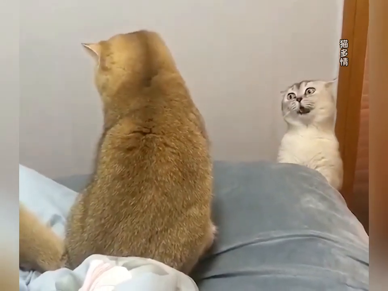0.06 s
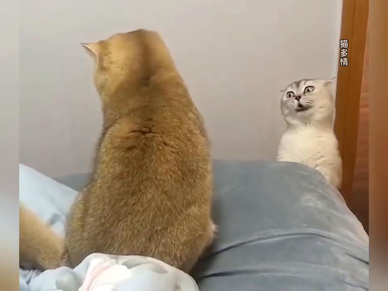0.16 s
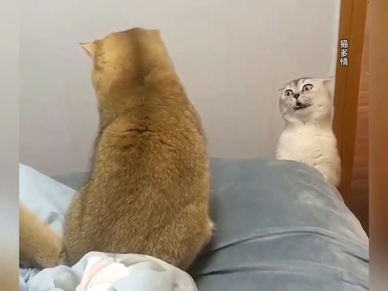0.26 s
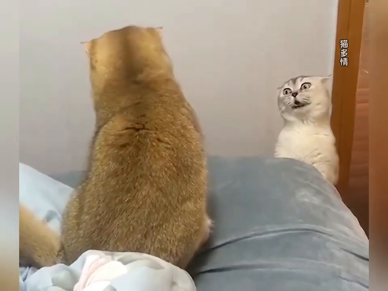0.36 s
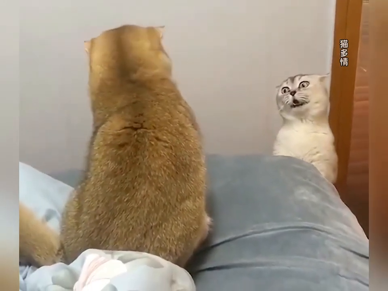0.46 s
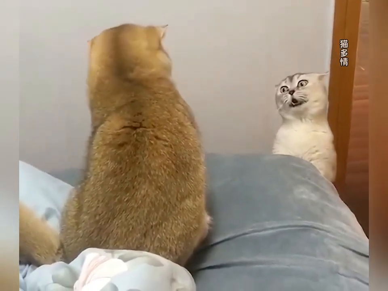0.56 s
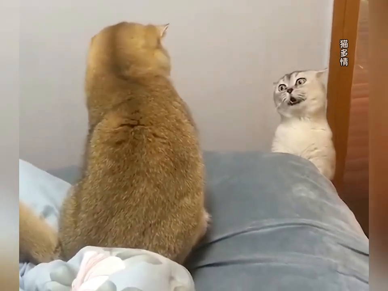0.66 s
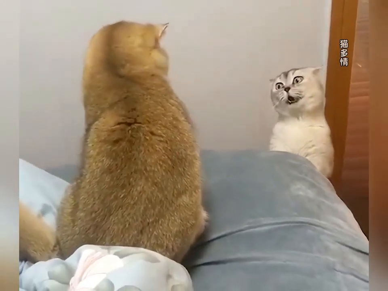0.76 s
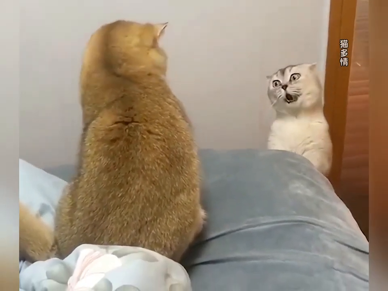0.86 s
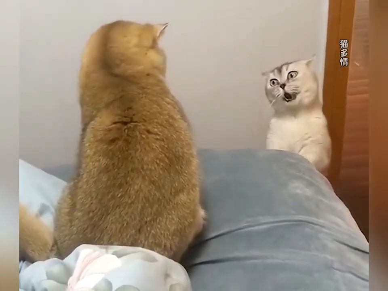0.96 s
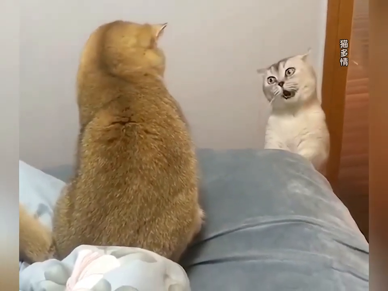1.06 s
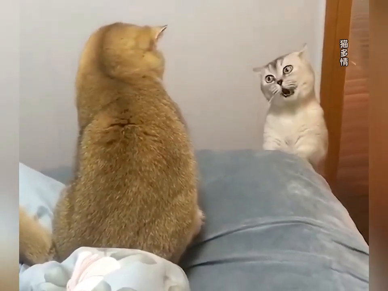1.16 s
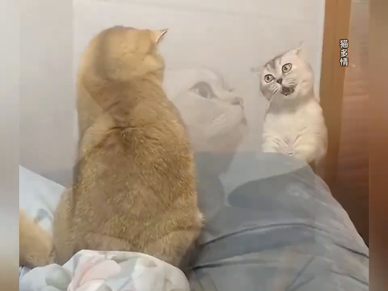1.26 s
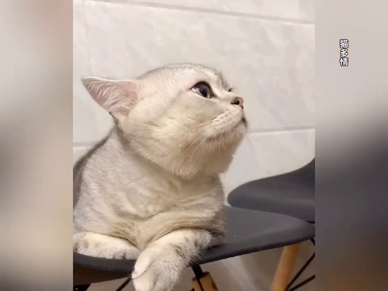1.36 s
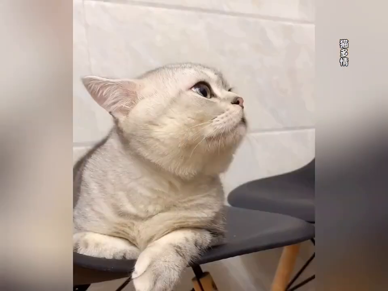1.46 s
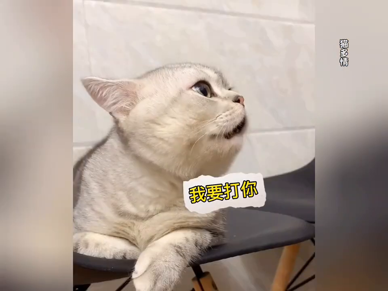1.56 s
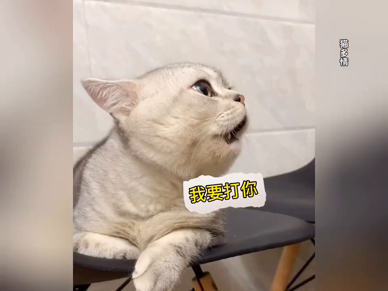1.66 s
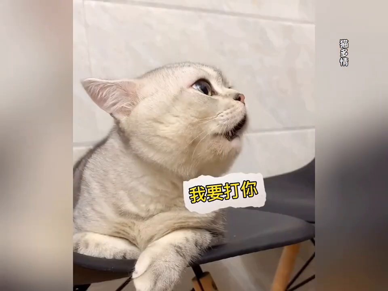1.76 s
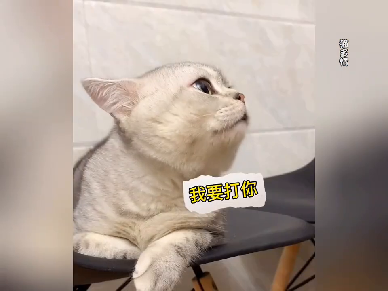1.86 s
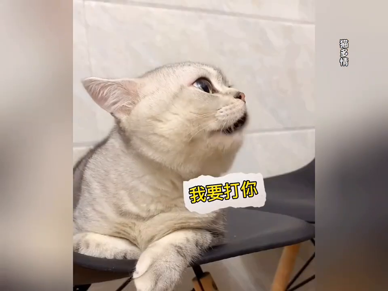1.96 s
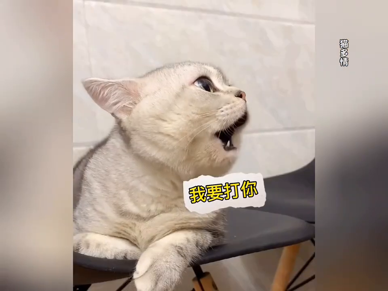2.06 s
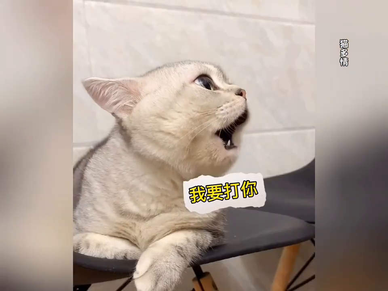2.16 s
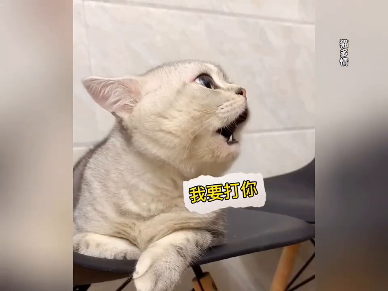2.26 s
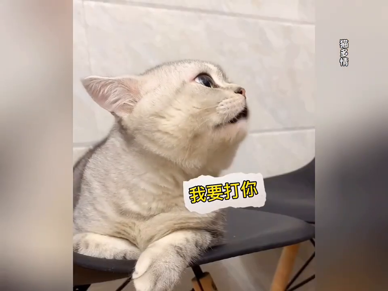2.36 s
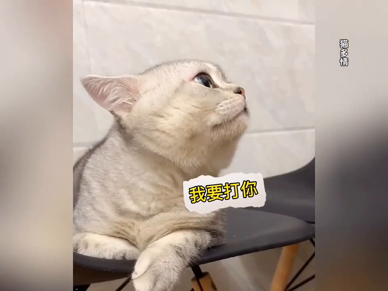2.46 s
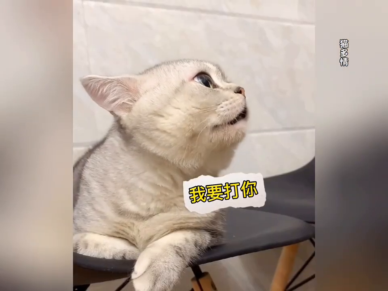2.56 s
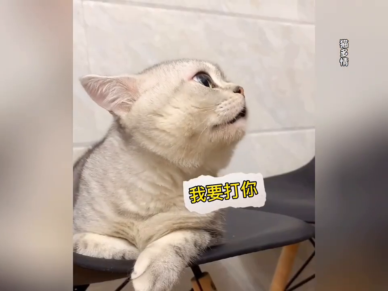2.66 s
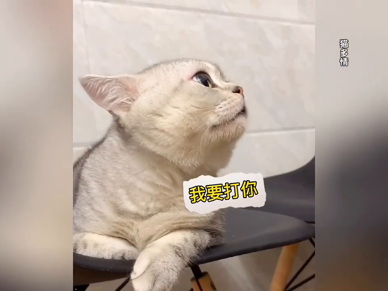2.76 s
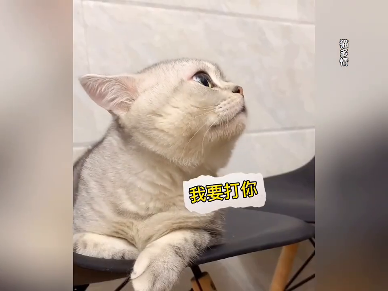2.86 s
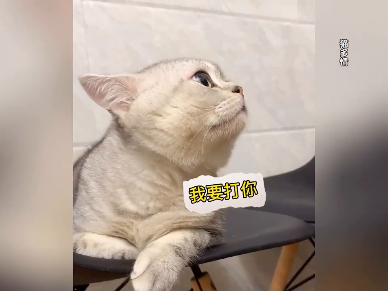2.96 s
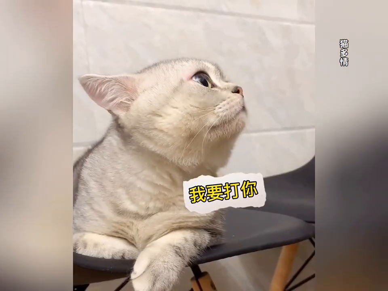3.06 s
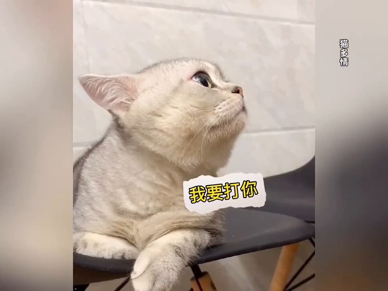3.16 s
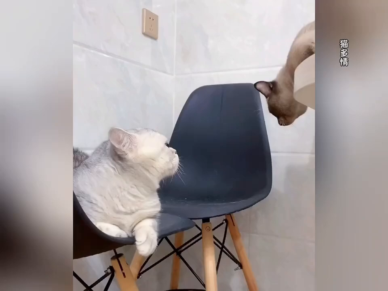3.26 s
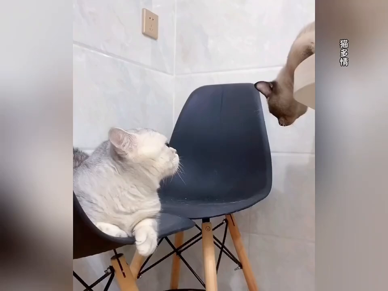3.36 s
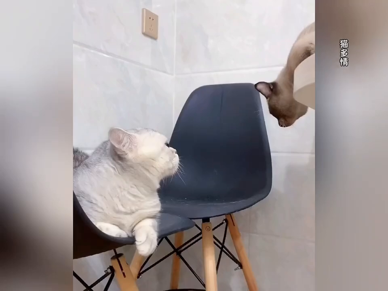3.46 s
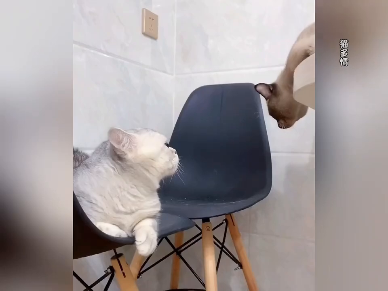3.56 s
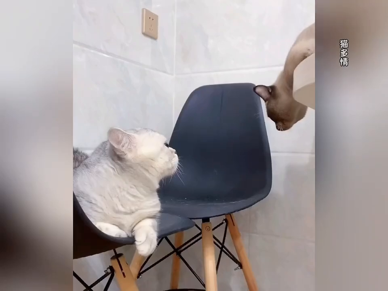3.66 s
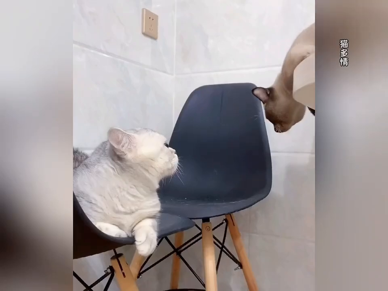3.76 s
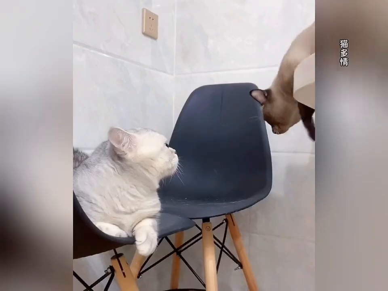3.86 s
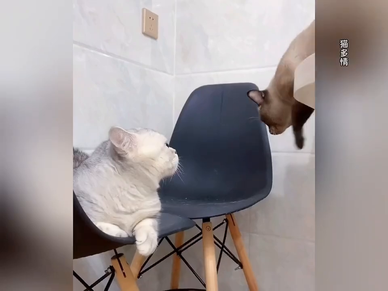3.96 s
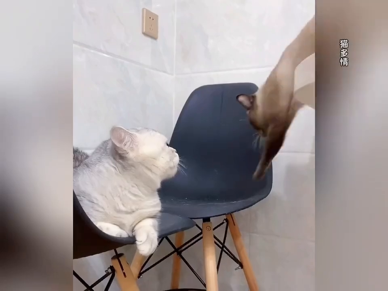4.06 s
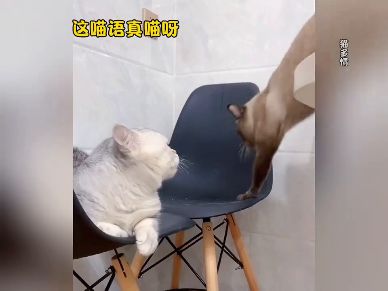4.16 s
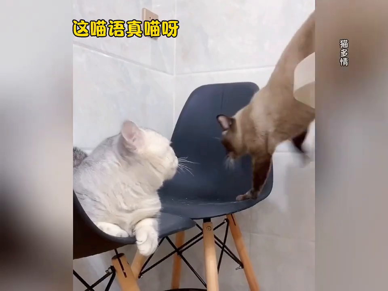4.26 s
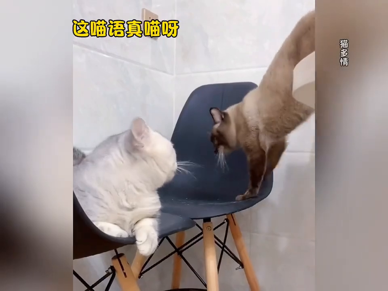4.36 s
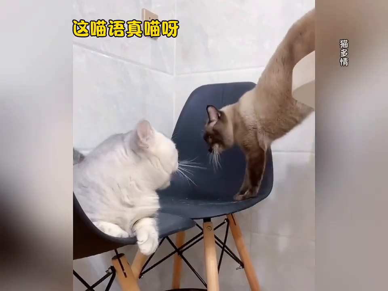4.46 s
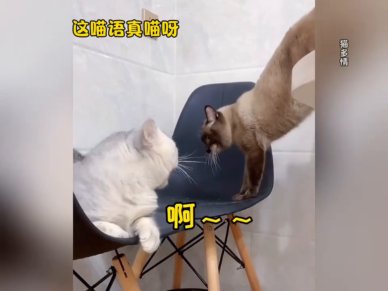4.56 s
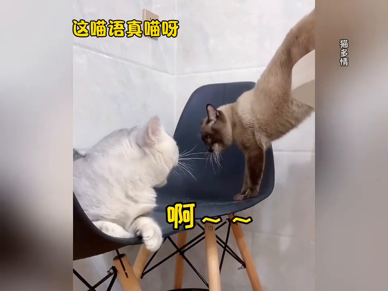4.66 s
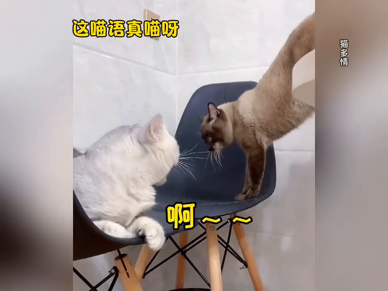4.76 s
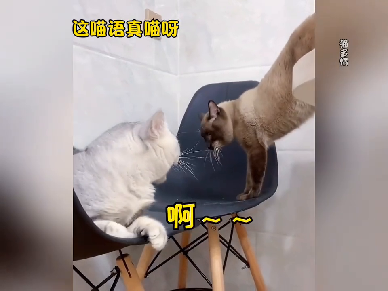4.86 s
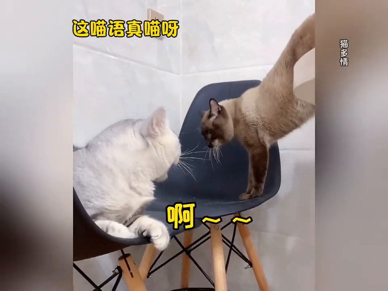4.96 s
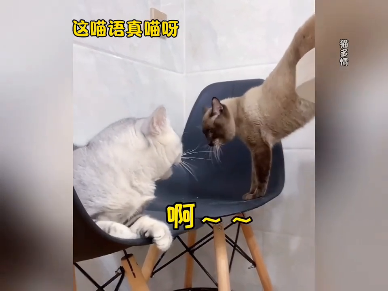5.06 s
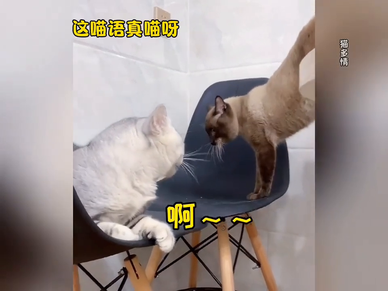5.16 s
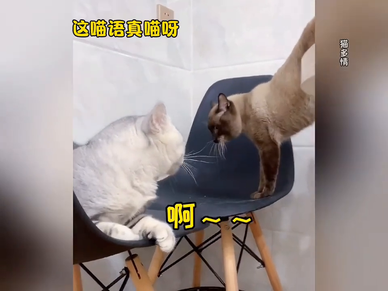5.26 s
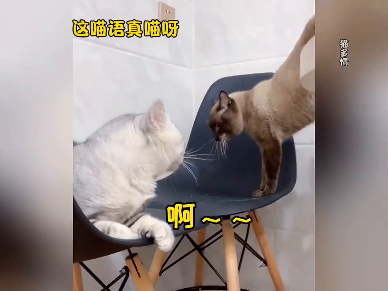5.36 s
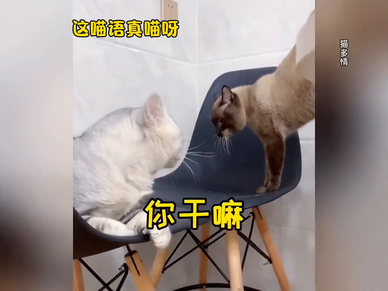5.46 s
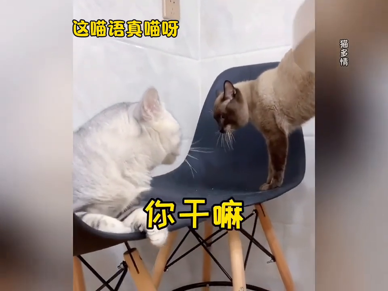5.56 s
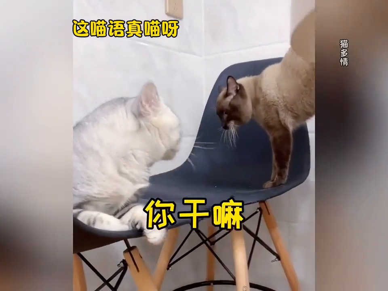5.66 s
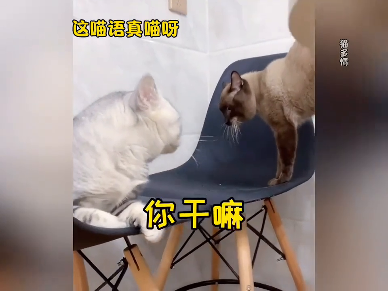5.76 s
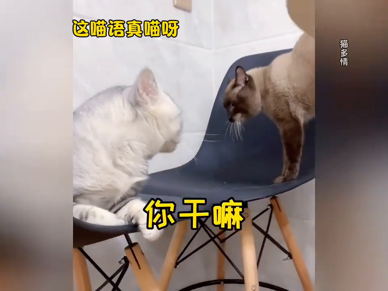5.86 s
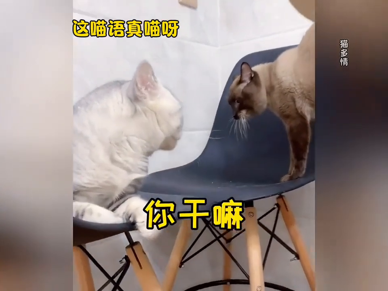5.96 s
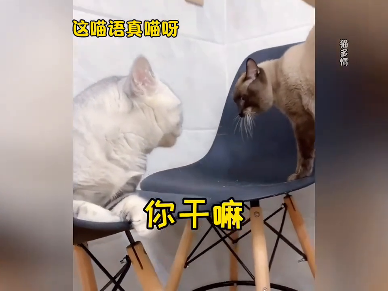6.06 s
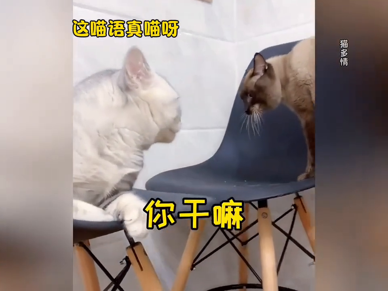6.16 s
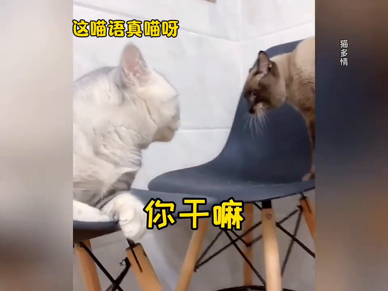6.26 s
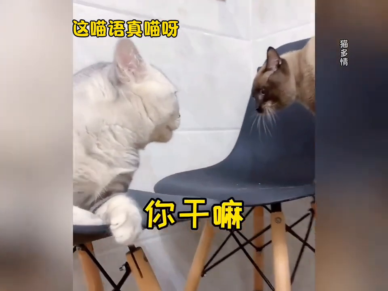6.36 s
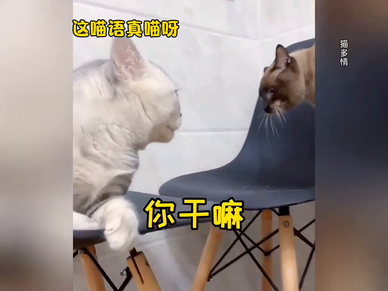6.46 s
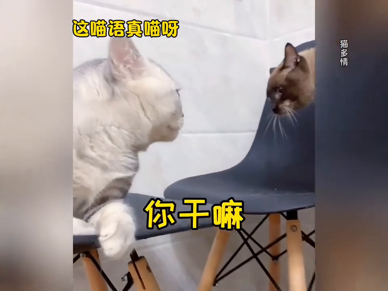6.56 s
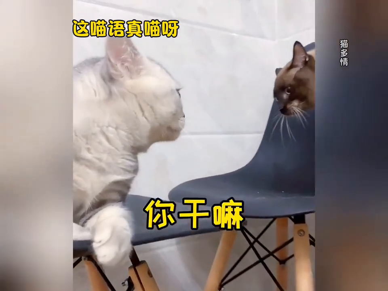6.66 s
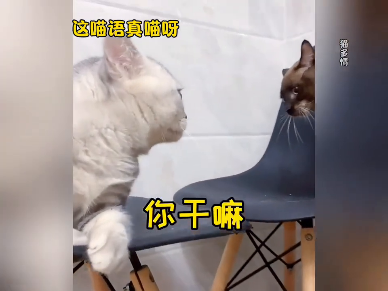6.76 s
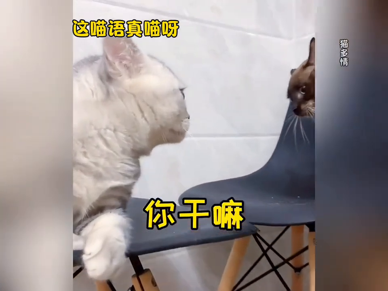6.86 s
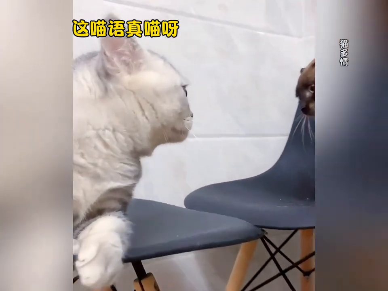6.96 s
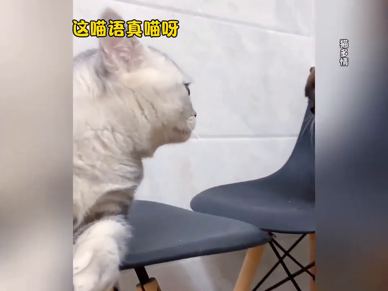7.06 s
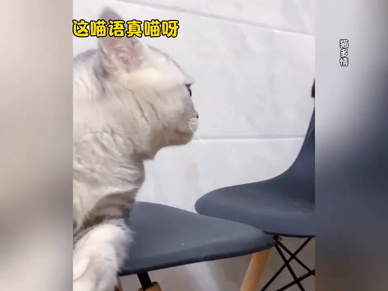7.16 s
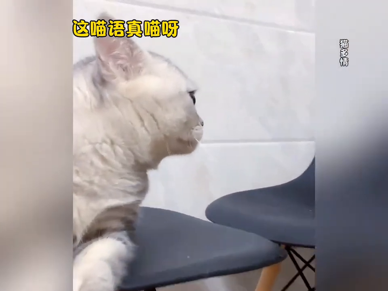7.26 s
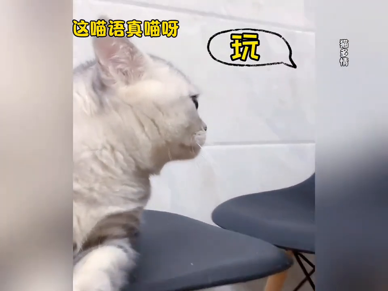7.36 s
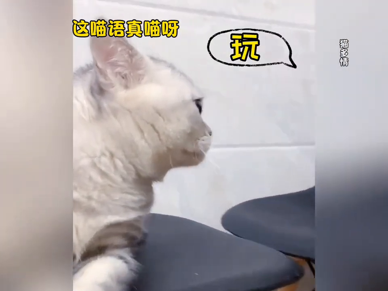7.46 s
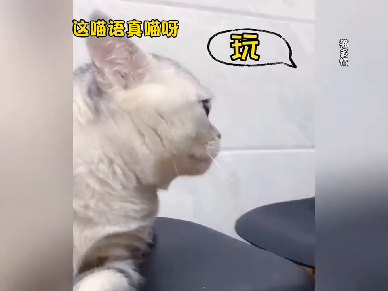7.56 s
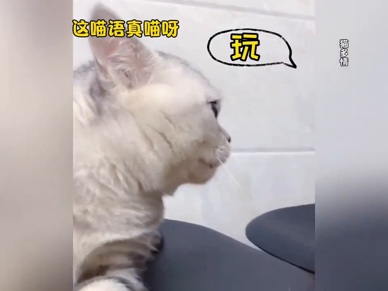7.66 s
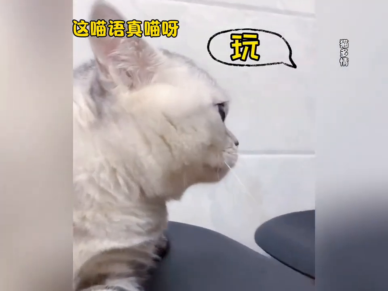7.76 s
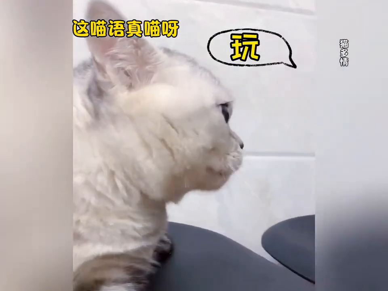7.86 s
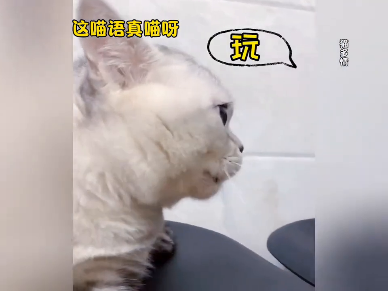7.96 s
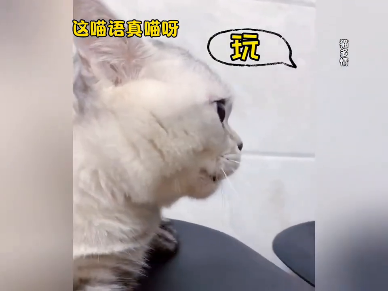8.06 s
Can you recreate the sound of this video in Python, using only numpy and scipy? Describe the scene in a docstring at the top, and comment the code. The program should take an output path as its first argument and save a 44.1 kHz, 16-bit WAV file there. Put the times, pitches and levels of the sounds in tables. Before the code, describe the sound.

Overloaded close cat yowl stops dead; in a tiled room a quieter arching moan, a huff, a rough screech falling into a yowl, then meows.

```python
"""A cat yowls indoors, hard and close enough to overload the microphone, and stops dead along with its room.
Then two cats on plastic chairs trade a long arched moan, a huff, a screech that sinks into a yowl, and two
short meows, while paws bump a chair in a tiled room that answers briefly. Voices are fold harmonics shaped by
mouth and throat resonances, with hissing air; the huff is shaped noise, and bumps are low swells.
Rumble and a faint wash lie beneath, with a hum near the end."""
import sys
import numpy as np
from scipy import signal
from scipy.fft import rfft, irfft, next_fast_len
from scipy.io import wavfile

SR = 44100
rng = np.random.default_rng(int(sys.argv[2]) if len(sys.argv) > 2 else 0)


def wav_out(sig):
    """Save sig, one row per channel (or a flat mono array), as 16-bit PCM at SR to the path in sys.argv[1]."""
    wavfile.write(sys.argv[1], SR, np.round(np.clip(np.atleast_2d(sig).T, -1, 1) * 32767).astype(np.int16))


N = 356769
TIME = np.arange(N) / SR  # s
MIC_EDGE_HZ = 7300  # edge of the microphone's main band; harmonics stop just above it


def amp(db):
    """Amplitude gain of a level in dB."""
    return 10 ** (np.asarray(db) / 20)


def evened(x):
    """The signal scaled to rms 1."""
    return x / np.sqrt(np.mean(abs(x) ** 2) + 1e-20)


def read(points, hz):
    """Value of a (frequency, value) curve at hz, on a log frequency axis."""
    f, value = np.transpose(points)
    return np.interp(np.log(hz + 1), np.log(f + 1), value)


def follow(rows, t):
    """Every column of a curve at the times t."""
    s, *columns = np.transpose(rows)
    return [np.interp(t, s, c) for c in columns]


def add(mix, s, sound):
    """Add a sound to the mix in place, starting at s seconds."""
    part = mix[max(round(s * SR), 0):][:len(sound)]
    part += sound[:len(part)]


def noise(colour, size):
    """Noise of rms about 1 with the given spectrum in dB."""
    n = next_fast_len(size)
    spectrum = rfft(rng.standard_normal(n)) * amp(read(colour, np.fft.rfftfreq(n, 1 / SR)))
    return evened(irfft(spectrum, n)[:size])


def waver(rate_hz, size):
    """Complex chance of rms about 1 that moves up to about rate_hz."""
    step = 16  # samples between random points
    n = next_fast_len(size // step + 2)
    z = rng.standard_normal((n, 2)) @ [1, 1j]
    z = np.fft.ifft(z / (1 + (np.fft.fftfreq(n, step / SR) / rate_hz) ** 2) ** 1.5)
    return np.interp(np.arange(size) / step, np.arange(n), evened(z))


def resonance(hz, centre_hz, width_hz):
    """Complex gain of three equal resonances in a row, 1 at the centre; width_hz is that of one alone."""
    return 1 / (1 + 2j * (hz - centre_hz) / width_hz) ** 3


def low_pass(x, edge_hz, size):
    """Linear-phase low-pass filter along each channel."""
    taps = signal.firwin(size, edge_hz, window=("kaiser", 7), fs=SR)
    return signal.oaconvolve(x, taps[None], "same")


def unsteady(number, hz, rough, flutter_hz):
    """Chance gain of one harmonic: rough folds flutter and turn hoarse, and high partials drift in strength."""
    drift = np.minimum((hz / 3200) ** 2, 1.2)
    parts = [(rough * np.sqrt(number / 5), flutter_hz), (.5 * rough, 280), (drift, 16)]  # (depth, rate Hz)
    shake = 1 + sum(depth * waver(rate, len(hz)) for depth, rate in parts)
    return shake / np.sqrt(1 + sum(depth ** 2 for depth, rate in parts))


# opening the mouth (octaves of jaw resonance above rest) takes sound from the nose,
# which follows the call's level only by a small share
JAW_REST_HZ, NASAL_DB_PER_OCTAVE, NASAL_SHARE = 1003, -14, .2
SETTLE_S = .14  # the extra roughness at the onset has halved by then


def cat(controls, throat, air, nasal_db, tongue_hz, tongue_lift_hz, tongue_width_hz, rough, onset_rough,
        air_db, ring_db, rasp_db, jitter, flutter_hz, lips_hz, jaw_width_hz=445, fade_s=0.0032):
    """Harmonics of the vocal folds pass two moving mouth resonances and the fixed upper throat; air hisses along."""
    t, pitch, level_db, jaw_hz, tongue_db, treble_db = controls
    opening = np.log2(jaw_hz / JAW_REST_HZ)
    nasal_gain = amp(nasal_db + NASAL_SHARE * level_db + NASAL_DB_PER_OCTAVE * opening)
    tongue_gain = amp(tongue_db)
    tongue_hz = tongue_hz + tongue_lift_hz * opening  # rises as the jaw opens

    rough = np.clip(rough + onset_rough / (1 + ((t - t[0]) / SETTLE_S) ** 7), 0, 1)
    pitch = pitch * (1 + jitter * (rough + 0.095) * waver(flutter_hz, len(t)).real)
    cycle = np.exp(2j * np.pi * np.cumsum(pitch) / SR)

    grid = np.arange(0, SR / 2, 10)  # Hz
    upper = np.sqrt(sum(abs(amp(db) * resonance(grid, f, w)) ** 2 for f, w, db in throat))
    lips = 1 / np.sqrt(1 + (grid / lips_hz) ** 20)

    mouth, mouth_power, ring, ring_power = 0, 1e-12, 0, 1e-12
    partial = cycle  # the fundamental itself leaves through the nose only
    for k in np.arange(2, int(MIC_EDGE_HZ / np.median(pitch)) + 3):
        hz, partial = k * pitch, partial * cycle
        shaken = partial * unsteady(k, hz, rough, flutter_hz)
        jaw = resonance(hz, jaw_hz, jaw_width_hz)
        tongue = resonance(hz, tongue_hz, tongue_width_hz)
        shaken = (shaken * jaw * tongue / abs(jaw * tongue)).real  # phase of both resonances
        mouth_gain = np.hypot(abs(jaw), tongue_gain * abs(tongue)) * np.interp(hz, grid, lips)
        mouth = mouth + mouth_gain * shaken
        mouth_power = mouth_power + mouth_gain ** 2 / 2
        ring_gain = np.interp(hz, grid, upper)
        ring = ring + ring_gain * shaken
        ring_power = ring_power + ring_gain ** 2 / 2

    rasp = noise(np.c_[grid, 20 * np.log10(upper)], len(t))  # turbulence rings the upper throat too
    hiss = amp(air_db) * noise(air, len(t)) + amp(rasp_db) * rasp
    hiss = hiss * (1 + 0.35 * cycle.real)  # one puff each cycle
    voice = nasal_gain * cycle.real + amp(level_db) * mouth / np.sqrt(mouth_power)
    voice = voice + amp(treble_db) * (amp(ring_db) * ring / np.sqrt(ring_power) + hiss)
    out = np.zeros(N)
    add(out, t[0], voice * np.clip(np.minimum(t - t[0], t[-1] - t) / fade_s, 0, 1))
    return out


def long_call(rows):
    """Times, pitch, level, mouth resonances and treble of a drawn-out call."""
    t = np.arange(rows[0][0], rows[-1][0], 1 / SR)
    return t, *follow(rows, t)


def closed_mouth(rows, jitter):
    """A cat's voice through the nose: an unsteady fundamental alone."""
    hz, db = follow(rows, TIME)
    turns = np.cumsum(hz * (1 + jitter * waver(40, N).real)) / SR
    return amp(db) * np.sin(2 * np.pi * turns) * (TIME > rows[0][0]) * (TIME < rows[-1][0])


# Path of the close yowl; all long calls share these columns: t/s, pitch f/Hz, mouth level/dB, jaw resonance f/Hz,
# tongue resonance level/dB against the jaw's, treble level/dB before each call's ring, air and rasp levels
YOWL = [(0.0, 380, -5, 1040, -19.5, -35.5), (0.101, 397.6, -14.5, 1000, -23.5, -40.0),
        (0.142, 409, -17.5, 1000, -22, -40.5), (0.194, 418.3, -16.5, 1080, -11.5, -38),
        (0.357, 405.3, -13.5, 1020, -13, -36.5), (0.515, 381, -8.5, 1110, -25, -37.5),
        (0.668, 365, -9, 950, -17.5, -33.5), (0.734, 369.7, -4.5, 1090, -12, -29),
        (0.774, 371.9, -5.5, 1250, -26, -30), (0.95, 374.9, -8, 1370, -13.5, -32),
        (1.16, 380.8, -9, 1440, -25.5, -30.0), (1.335, 374.9, -7.5, 1408, -12.5, -31.5)]
# Upper resonances of a throat: f/Hz, width of one stage f/Hz, level/dB
YOWL_THROAT = [(3670, 350, -7), (4140, 150, -6.5), (4380, 230, 0.5), (4970, 550, -8.5), (5302, 150, 3),
               (6000, 820, -12.5), (6750, 1200, -15.5)]
# Air rushing through the folds: f/Hz, relative level/dB per Hz
YOWL_AIR = [(150, -12.5), (500, -5), (1000, 1.5), (1500, 7), (2000, 5.5), (2800, 7), (3400, -9.5),
            (4400, 2.5), (5200, -3.5), (6000, -3.5), (6900, -16.5), (7700, -22.5)]


def close_yowl():
    """The loud opening yowl, close to the microphone: fold harmonics through a moving mouth, with hiss."""
    return cat(long_call(YOWL), YOWL_THROAT, YOWL_AIR, nasal_db=-23.5,
               tongue_hz=2352, tongue_lift_hz=860, tongue_width_hz=575, rough=0.089, onset_rough=.03,
               air_db=0.5, ring_db=-4.5, rasp_db=-10.5, jitter=.03, flutter_hz=61, lips_hz=3370, jaw_width_hz=411)


# Spectrum of the low rumble: f/Hz, relative level/dB
RUMBLE = [(15, -2), (30, -9), (55, -5), (100, -1.5), (150, -8.5), (220, -9.5), (400, -40.5)]
# Spectrum of the faint wash: f/Hz, relative level/dB
WASH = [(71, -35), (120, -11), (251, -7.5), (457, -2), (533, -7.5), (591, -8.5), (907, -12.5),
        (1130, -12.5), (1320, -12), (4950, -28), (7220, -43.5), (9390, -79), (15900, -120)]
# Broad swells: centre t/s, time to 1/e of the gain t/s, rumble level/dB, wash level/dB
SWELLS = [(0.101, .7, -51.5, -46), (4.35, 0.44, -50.5, -49.5), (7.4, 1.5, -57, -62)]
RUMBLE_DB, WASH_DB = -65.5, -53.5  # steady part; the rumble's is for the share common to both channels
HUM_HZ, HUM_DB, HUM_FROM_S, HUM_RISE_S = 54.6, -44, 6.75, 0.31  # level is the mean peak


def background():
    """Low rumble and a faint wash of shaped noise that swell now and then, and a hum near the end."""
    power = amp([[RUMBLE_DB], [WASH_DB]]) ** 2
    for s, half, rumble_db, wash_db in SWELLS:
        power = power + (amp([[rumble_db], [wash_db]]) * np.exp(-((TIME - s) / half) ** 2)) ** 2
    rumble_gain, wash_gain = np.sqrt(power)
    # mostly independent at left and right
    rumble = noise(RUMBLE, N) + 2.7 * np.array([noise(RUMBLE, N), noise(RUMBLE, N)])
    hum = np.sin(2 * np.pi * HUM_HZ * TIME) * (1 + .25 * waver(4, N).real)
    hum = hum * np.clip((TIME - HUM_FROM_S) / HUM_RISE_S, 0, 1)
    return rumble_gain * rumble + wash_gain * noise(WASH, N) + amp(HUM_DB) * hum


# Soft bumps on seat and bedding: centre t/s, level/dB before the lift and channel gains, f/Hz, half length t/s
BUMPS = [(0.697, -47, 40.28, 0.23), (4.094, -38.5, 75.88, 0.059), (4.22, -45.5, 100, 0.16),
         (4.637, -34.5, 46.4, 0.19), (6.284, -50.5, 53, 0.35)]


def bumps():
    """Soft weight on a seat: a shaky low tone that swells with no click, stronger at the right."""
    out = np.zeros(N)
    for s, db, hz, half in BUMPS:
        size = int(2 * half * SR)
        shake = evened(1 + 0.68 * waver(25, size))
        tone = (shake * np.exp(2j * np.pi * hz * TIME[:size])).real
        lift_db = 5.5  # about what the swell takes away
        add(out, s - half, amp(db + lift_db) * signal.windows.hann(size) ** 2 * tone)
    return out * amp([[-4], [2]])


# Path of the arched moan: t/s, pitch f/Hz, level/dB, jaw f/Hz, tongue level/dB, treble level/dB
MOAN = [(1.34, 368.1, -73, 1240, -15.5, -70.5), (1.366, 368.5, -50.5, 660, -15.0, -66.5),
        (1.435, 377, -49, 699, -10.5, -71), (1.594, 424.9, -21.5, 1273, -35, -61.5),
        (1.744, 453.7, -25.5, 1168, -28, -73.5), (1.864, 467.6, -29.0, 854, -7.5, -67.5),
        (1.994, 460.8, -14.0, 1394, -20.0, -49.5), (2.096, 495.3, -24.0, 1320, -5.0, -62),
        (2.243, 504, -27.5, 1220, -5.5, -61), (2.343, 488, -20.5, 930, -10, -63.5),
        (2.389, 501.6, -37, 1060, -12, -66), (2.45, 463.9, -26.5, 1010, -11.5, -55.5),
        (2.843, 430.6, -28.5, 925, -12.5, -60.5), (3.006, 346.3, -35, 559, -15.5, -66.5),
        (3.21, 283.3, -37.0, 691, -18.5, -71)]
# Throat of the moan and the meows: f/Hz, width of one stage f/Hz, level/dB
MOAN_THROAT = [(2950, 1400, -5), (3780, 190, -5.5), (4114, 120, 0), (4800, 190, -10.5), (6040, 650, -15.5)]
# Air of all the calls after the first: f/Hz, relative level/dB per Hz
SOFT_AIR = [(200, -19), (800, 6), (1600, 4.5), (2600, 2), (3300, -7), (4200, -5.5), (5300, -10.5),
            (6400, -14), (7300, -25.5)]


def moan():
    """A long moan whose fold harmonics rise and sink in pitch."""
    return cat(long_call(MOAN), MOAN_THROAT, SOFT_AIR, nasal_db=-34.5,
               tongue_hz=2010, tongue_lift_hz=170, tongue_width_hz=370, rough=.11, onset_rough=.02,
               air_db=1.5, ring_db=-2.0, rasp_db=-19.5, jitter=0.032, flutter_hz=35, lips_hz=2940, jaw_width_hz=607)


# The other cat's moan underneath: t/s, pitch f/Hz, peak level/dB
UNDERTONE = [(1.62, 415, -62), (1.73, 403, -39), (2.03, 357, -44.5), (2.14, 329, -52.5), (2.42, 313, -62)]


def undertone():
    """The other cat moans underneath with its mouth shut, so only the fundamental gets out."""
    return closed_mouth(UNDERTONE, jitter=0.011)


# Spectrum of the spat air: f/Hz, relative level/dB
HUFF_COLOUR = [(88, -51), (150, -26.5), (188, -1), (306, -12.5), (459, -6), (567, -23), (666, -23.5),
               (734, 3), (796, -6), (999, -3.5), (1380, -18.5), (2360, -32), (3060, -22), (3480, -34.5),
               (7220, -49.5), (9390, -82), (15900, -120)]
# Grunt under the huff: t/s, pitch f/Hz, peak level/dB
GRUNT = [(4.1, 187.5, -49), (4.22, 195.7, -41.5), (4.3, 209, -44.5), (4.37, 223, -57)]
HUFF_AT_S, HUFF_DB, HUFF_RISE_DB_PER_S, HUFF_FALL_DB_PER_S = 4.22, -29.5, 299.5, 189.5


def huff():
    """A cat spits a puff of air, shaped noise, over a low grunt."""
    t = TIME - HUFF_AT_S
    level_db = HUFF_DB + np.minimum(HUFF_RISE_DB_PER_S * t, -HUFF_FALL_DB_PER_S * t)
    return amp(level_db) * noise(HUFF_COLOUR, N) + closed_mouth(GRUNT, jitter=0.015)


# Path of the screech: t/s, pitch f/Hz, level/dB, jaw f/Hz, tongue level/dB, treble level/dB
SCREECH = [(4.365, 233, -31, 1120, -11, -66.5), (4.417, 323, -15.5, 1265, -17, -47),
           (4.516, 485, -9.5, 1540, -14.5, -43), (4.572, 527.2, -8.5, 1665, -9, -45.5),
           (4.726, 581.8, -17, 1546, -17, -47), (4.79, 587.3, -13.5, 1538, -9.5, -43.5),
           (4.935, 588, -19.5, 1373, -11, -49), (5.063, 559.3, -17, 953, -16, -45.5),
           (5.197, 537, -29.5, 900, -15, -44), (5.345, 520, -39, 743, -20, -67.5)]
# Its throat: f/Hz, width of one stage f/Hz, level/dB
SCREECH_THROAT = [(3530, 770, 2), (4370, 490, -1.5), (4700, 300, -11.5), (5230, 470, -14),
                  (6100, 610, -10.5), (6700, 350, -40)]


def screech():
    """A screech whose folds start very rough and soon settle."""
    return cat(long_call(SCREECH), SCREECH_THROAT, SOFT_AIR, nasal_db=-36.0,
               tongue_hz=1930, tongue_lift_hz=326, tongue_width_hz=780, rough=.04, onset_rough=0.83,
               air_db=-2, ring_db=-3.5, rasp_db=-14, jitter=.039, flutter_hz=70, lips_hz=3240)


# Path of the yowl after the screech: t/s, pitch f/Hz, level/dB, jaw f/Hz, tongue level/dB, treble level/dB
WAIL = [(5.345, 526.7, -39, 1160, -5, -63), (5.394, 507.0, -34.5, 510, -15, -62.5),
        (5.557, 489, -45, 660, -15, -70), (5.639, 461.3, -22, 930, -9, -60),
        (5.71, 467.2, -44, 1185, -10.5, -67), (5.802, 455.3, -34.5, 920, -21, -70),
        (5.927, 420, -13.5, 860, -15.5, -56), (6.167, 406.7, -17, 915, -18, -47.5),
        (6.367, 405.2, -15, 960, -18.5, -51.5), (6.628, 391.6, -17.5, 770, -19.0, -52),
        (6.728, 388.6, -27.5, 681, -31.5, -65.5), (6.92, 302.5, -27.0, 683, -30, -60),
        (6.97, 294, -52, 647, -23, -71.5)]
# Its throat: f/Hz, width of one stage f/Hz, level/dB
WAIL_THROAT = [(3790, 410, -6.5), (3960, 510, -1.5), (4860, 330, -7), (5370, 130, -10), (5570, 300, -14.5)]


def sinking_yowl():
    """The yowl into which the screech sinks, its fold harmonics falling in pitch."""
    return cat(long_call(WAIL), WAIL_THROAT, SOFT_AIR, nasal_db=-25.5,
               tongue_hz=1797, tongue_lift_hz=70, tongue_width_hz=454, rough=.045, onset_rough=0.027,
               air_db=-7, ring_db=-5.5, rasp_db=-9.5, jitter=0.065, flutter_hz=50, lips_hz=2560, jaw_width_hz=436)


# a meow's pitch climbs from low towards a goal, against a steady sag that wins if the meow lasts long enough
MEOW_LOW_HZ, MEOW_GOAL_HZ, MEOW_SAG_HZ_PER_S = 249.2, 512.2, 195
# a mouth that has time for it is widest after two rise times, then closes slowly
MEOW_SHUT_HZ, MEOW_OPEN_HZ, MEOW_GAPE_POWER = 512, 1504, 1.76
# it starts as a dull mutter and catches suddenly; the fade, growing with time squared, works against the swell
MUTTER_DB, MUTTER_TREBLE_DB, CATCH_S, CATCH_RISE_S, MEOW_FADE_DB_PER_S2 = -31.5, -74.5, 0.059, 0.0028, 51
# its tongue resonance is strongest at a set time after the start, if the meow lasts that long;
# the half length is the time to 1/e of the rise in dB
TONGUE_SHUT_DB, TONGUE_OPEN_DB, TONGUE_AT_S, TONGUE_HALF_S = -35, -1, 0.31, 0.095


def meow(start, length, rise, caught_db, swell_db_per_s, treble_db):
    """The controls of a short meow: pitch and mouth shoot up, and sink again if it lasts long enough."""
    t = np.arange(0, length, 1 / SR)
    pitch = MEOW_GOAL_HZ - (MEOW_GOAL_HZ - MEOW_LOW_HZ) * np.exp(-t / rise) - MEOW_SAG_HZ_PER_S * t
    gape = (t / (2 * rise) * np.exp(1 - t / (2 * rise))) ** MEOW_GAPE_POWER
    jaw_hz = MEOW_SHUT_HZ + (MEOW_OPEN_HZ - MEOW_SHUT_HZ) * gape
    tongue_out = np.exp(-((t - TONGUE_AT_S) / TONGUE_HALF_S) ** 2)
    tongue_db = TONGUE_SHUT_DB + (TONGUE_OPEN_DB - TONGUE_SHUT_DB) * tongue_out
    since = t - CATCH_S
    caught = np.clip(since / CATCH_RISE_S, 0, 1)
    swell_db = swell_db_per_s * since - MEOW_FADE_DB_PER_S2 * since ** 2
    level_db = (1 - caught) * MUTTER_DB + caught * (caught_db + swell_db)
    treble_db = (1 - caught) * MUTTER_TREBLE_DB + caught * (treble_db + swell_db)
    return start + t, pitch, level_db, jaw_hz, tongue_db, treble_db


# Short meows: start t/s, length t/s, rise t/s, level/dB once the voice catches, swell level/dB per s,
# treble level/dB before ring, air and rasp levels
MEOWS = [(7.297, .655, .104, -23, -0.5, -58), (7.962, .13, .17, -19.5, 138, -60.5)]


def meows():
    """Two short meows, each a mutter until the folds catch."""
    return sum(cat(meow(*row), MOAN_THROAT, SOFT_AIR, nasal_db=-33,
                   tongue_hz=1887, tongue_lift_hz=60, tongue_width_hz=560, rough=0.11, onset_rough=.22,
                   air_db=3, ring_db=-6.5, rasp_db=-19.5, jitter=0.027, flutter_hz=45.4, lips_hz=2400,
                   jaw_width_hz=545) for row in MEOWS)


# How long the room rings: f/Hz, time to fall by 60 dB t/s
ROOM = [(200, 0.5), (800, 0.31), (2500, 0.39), (7000, 0.045)]
# The tiles throw back mostly treble: f/Hz, level/dB
WALLS = [(300, -13), (1500, -15), (2500, -10), (4000, -2)]


def room(x, side_db):
    """Sparse reflections, each band dying at its own speed; the two ports hear nearly the same."""
    size, step = SR // 2, 20  # samples; one reflection per step
    taps = np.zeros((2, size))
    at = np.arange(SR // 250, size - step, step)  # first reflections from 4 ms
    at = at + rng.integers(0, step, (2, len(at)))
    np.put_along_axis(taps, at, rng.choice([-1., 1.], at.shape), 1)
    hz, t, z = signal.stft(taps, SR, nperseg=256)
    decay = amp(-60 * t / read(ROOM, hz)[:, None])
    tail = signal.istft(z * decay, SR, nperseg=256)[1]
    tail = tail / np.linalg.norm(tail[0])
    walls = amp(read(WALLS, np.fft.rfftfreq(tail.shape[1], 1 / SR)))
    mid = signal.fftconvolve(x, irfft(rfft(tail[0]) * walls))[:N]
    side = signal.fftconvolve(x, tail[1])[:N]
    return x + mid + amp(side_db) * np.array([side, -side])


CUT_S = 1.337  # the first yowl starts its very short fade-out here


def scene():
    """The first yowl stops dead with its room; the other calls share the tiled corner."""
    before_cut = np.clip((CUT_S - TIME) / 0.0022 + 1, 0, 1)
    first = room(close_yowl(), side_db=-61.5) * before_cut
    calls = moan() + undertone() + huff() + screech() + sinking_yowl() + meows()
    return first + room(calls, side_db=-18.5) + bumps() + background()


SHELF_EDGE_HZ, EDGE_HZ = 9700, 15700  # ends of the weak shelf and of the whole band


def record(dry):
    """The microphone input saturates; a narrow band with a weak shelf, a hard stop at full scale, a band limit."""
    squashed = dry / (1 + (dry / 1.1) ** 8) ** (1 / 8)
    shelf = .25  # share of the wider band
    main_band = low_pass(squashed, MIC_EDGE_HZ, size=151)
    shelf_band = low_pass(squashed, SHELF_EDGE_HZ, size=101)
    narrow = (1 - shelf) * main_band + shelf * shelf_band
    return low_pass(np.clip(narrow, -1, 1), EDGE_HZ, size=255)


dry = scene()
out = record(dry)
wav_out(out)
```